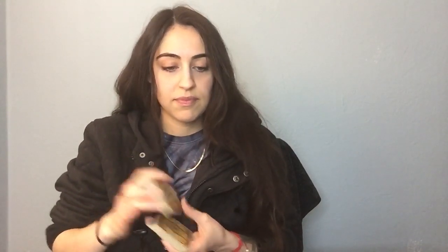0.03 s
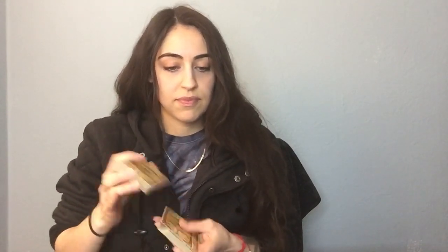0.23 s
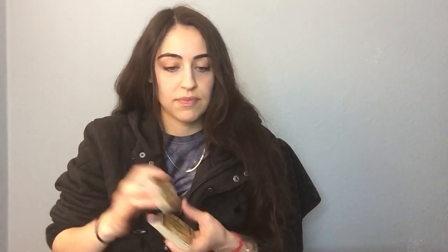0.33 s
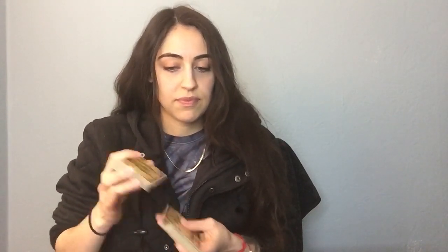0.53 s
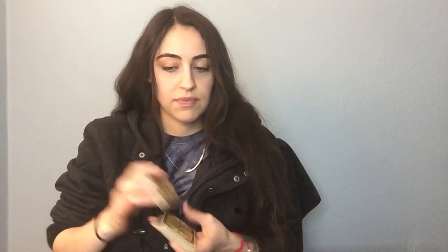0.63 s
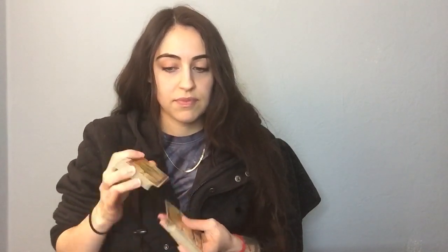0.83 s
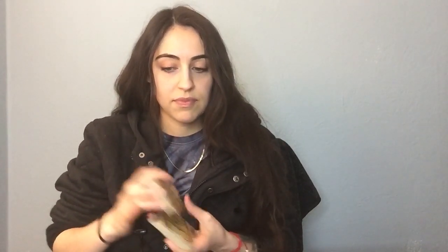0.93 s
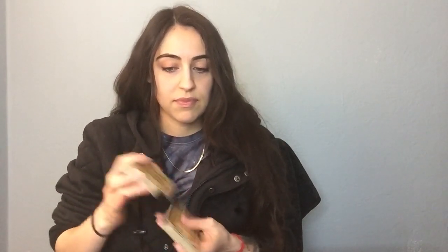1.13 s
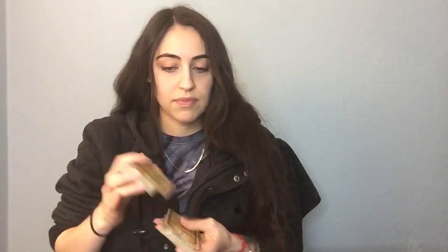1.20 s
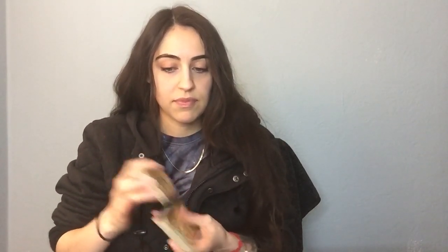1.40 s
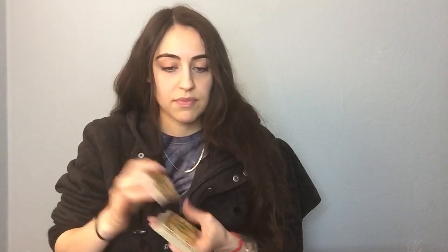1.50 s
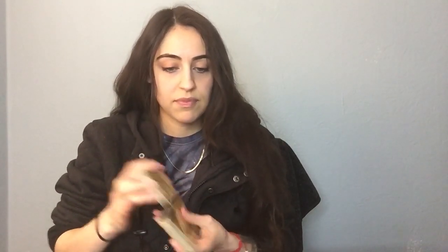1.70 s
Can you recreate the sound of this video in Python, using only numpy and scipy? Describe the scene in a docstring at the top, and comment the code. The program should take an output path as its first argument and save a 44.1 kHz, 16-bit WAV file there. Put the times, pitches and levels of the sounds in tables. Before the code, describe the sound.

Playing cards shuffled overhand, five crisp papery clacks in a steady rhythm, small quiet room

```python
"""Overhand card shuffle

A deck of playing cards is shuffled overhand in a small room: five strokes, about three a second.
In each stroke the lifted packet brushes the deck (grainy noise), its edges clack down (a burst of tiny impacts)
and make the held cards ring briefly (damped modes), then cards slide off with a papery rasp and flicking edges.
Faint taps of handling fall around the strokes, one dull thump joins the second, and quiet room tone lies below.
"""
import sys
import numpy as np
from scipy import signal
from scipy.fft import rfft, irfft
from scipy.io import wavfile
from scipy.ndimage import uniform_filter1d

SR = 44100
rng = np.random.default_rng(int(sys.argv[2]) if len(sys.argv) > 2 else 0)


def dump_mix(stems):
    """Bounce the given channels to the path in sys.argv[1] as a 16-bit WAV at rate SR."""
    frames = np.atleast_2d(stems).T  # one column per channel
    limited = np.clip(frames, -1, 1)  # hard clip at full scale
    pcm = np.round(limited * 32767).astype(np.int16)
    wavfile.write(sys.argv[1], SR, pcm)


N = 77175  # length [samples]


def amp(db):
    """Decibels to gain."""
    return 10 ** (np.asarray(db) / 20)


def unit(x):
    """Scales to rms 1."""
    return x / np.sqrt(np.mean(x ** 2) + 1e-20)


def read(points, hz):
    """Reads a table on a log-frequency axis."""
    f, value = np.transpose(points)
    return np.interp(np.log(hz + 1), np.log(f + 1), value)


def add(mix, s, sound):
    """Mixes a sound in at time s, trimming whatever falls outside the mix."""
    start = round(s * SR)
    sound = sound[max(-start, 0):]
    part = mix[max(start, 0):][:len(sound)]
    part += sound[:len(part)]


BASS_HZ, TREBLE_HZ = 610, 3050  # shelf corners
PRESENCE_HZ, PRESENCE_OCTAVES = 2870, 0.54  # centre and half-width of the presence bell


def colour(x, points, bass_db=0, presence_db=0, treble_db=0, size=4096):
    """Causal filter: a spectrum of unit power, then bass, presence and treble controls."""
    hz = abs(np.fft.fftfreq(size, 1 / SR))
    bass = 1 / (1 + (hz / BASS_HZ) ** 4)
    treble = 1 - 1 / (1 + (hz / TREBLE_HZ) ** 4)
    presence = np.exp(-(np.log2((hz + 1) / PRESENCE_HZ) / PRESENCE_OCTAVES) ** 2)
    tone_db = bass_db * bass + presence_db * presence + treble_db * treble
    gain = unit(amp(read(points, hz))) * amp(tone_db)
    # minimum phase: the response starts at once, with no pre-echo
    spectrum = np.exp(np.conj(signal.hilbert(np.log(gain))))
    taps = np.fft.ifft(spectrum).real
    return signal.fftconvolve(x, taps[:size // 2])[:len(x)]


EDGES_PER_S, EDGE_SPREAD_DB = 7000, 1  # card-edge impacts: mean rate, unevenness
FIBRES_PER_S, FIBRE_SPREAD_DB = 6000, 2  # paper-fibre catches: mean rate, unevenness


def grains(envelope, per_s, spread_db):
    """Random tiny impacts of uneven size that carry the energy of the envelope."""
    n = len(envelope)
    size = amp(spread_db * np.minimum(rng.exponential(1, n), 4))
    sign = rng.choice([-1, 1], n)
    struck = rng.random(n) < per_s / SR
    impacts = envelope * size * sign * struck
    return unit(impacts) * np.sqrt(np.mean(envelope ** 2))


def mode(hz, db, t60, rise_s, waver=0):
    """One damped vibration with a soft build-up; waver is the rms pitch drift as a fraction."""
    t = np.arange(SR // 5) / SR
    drift = unit(uniform_filter1d(rng.standard_normal(len(t)), size=130))
    pitch = hz * (1 + waver * drift)
    turns = np.cumsum(pitch) / SR + rng.random()
    rise = 1 - np.exp(-t / rise_s)
    decay = np.exp(-np.log(1000) * t / t60)
    return amp(db) * rise * decay * np.sin(2 * np.pi * turns)


# spectrum of the quiet room: (frequency [Hz], relative level [dB])
ROOM_TONE_COLOUR = [(25, -20.5), (38, -14), (52, -1), (100, -4.5), (160, -8), (250, -9.5), (320, -5),
                    (450, -12), (600, -13), (1040, -14), (1650, -17), (2200, -19), (4800, -22), (6500, -21),
                    (10500, -29), (16000, -30)]
ROOM_TONE_DB = -68.5  # rms level


def room_tone():
    """Quiet steady rumble and hiss: white noise shaped by the room's spectrum."""
    white = rng.standard_normal(N)
    shape = amp(read(ROOM_TONE_COLOUR, np.fft.rfftfreq(N, 1 / SR)))
    return amp(ROOM_TONE_DB) * unit(irfft(rfft(white) * shape, N))


# soft taps of fingers and cards:
# (time [s], level [dB], decay [s], pitch [Hz], ring relative to level [dB])
TAPS = [(.001, -57.5, 0.026, 855, -12), (0.345, -56.5, 0.0041, 1280, 11), (0.65, -59.5, 0.0046, 1400, 11),
        (.934, -64, .003, 1520, 14), (0.964, -66, 0.0093, 1760, 14), (.973, -62, 0.014, 1240, 5),
        (.997, -69, 0.0018, 1200, 24)]
# spectrum of the touch: (frequency [Hz], relative level [dB])
TAP_COLOUR = [(60, -20.5), (300, -7.5), (800, -4.5), (1300, -1.5), (2200, -8), (5000, -16), (15000, -30.5)]
TAP_RISE_S, TAP_T60_S = 0.0018, 0.013  # the ring


def tap(db, decay_s, hz, ring_db):
    """A dull little touch on the deck with a short ring."""
    t = np.arange(SR // 5) / SR
    impacts = grains(np.exp(-t / decay_s), EDGES_PER_S, EDGE_SPREAD_DB)
    touch = colour(impacts, TAP_COLOUR)
    ring = mode(hz, ring_db, TAP_T60_S, TAP_RISE_S)
    return amp(db) * (touch + ring)


# room decay: (frequency [Hz], t60 [s])
ROOM = [(200, 0.24), (700, 0.16), (1500, 0.16), (4500, 0.16), (8000, 0.14), (15000, 0.043)]
ROOM_DB, ROOM_DELAY_S = -15.5, .005
ECHOES_PER_S = 4000


def room(x, size=256):
    """Dense reflections from near walls, the top of the treble dying first."""
    n = SR // 2
    echoes = rng.choice([-1., 1.], n) * (rng.random(n) < ECHOES_PER_S / SR)
    hz, t, bands = signal.stft(echoes, SR, nperseg=size)
    decay = np.exp(-np.log(1000) * t / read(ROOM, hz)[:, None])
    tail = signal.istft(bands * decay, SR, nperseg=size)[1]
    wet = np.zeros(N)
    add(wet, ROOM_DELAY_S, signal.fftconvolve(x, tail / np.linalg.norm(tail)))
    return amp(ROOM_DB) * wet


# spectrum of card faces and edges rubbing: (frequency [Hz], relative level [dB])
PAPER_COLOUR = [(25, -41), (70, -18.5), (140, -15.5), (220, -2), (400, -0.5), (750, 0), (1500, 1),
                (2500, -1), (4200, -3), (7000, -5.5), (10400, -12), (12500, -10), (15500, -18)]


def rasp(peak_s, db, rise_s, fall_s, bass_db, treble_db, swell_power):
    """Paper faces catch and slip in a rasp that swells and fades; returns start time and sound."""
    t = np.arange(-SR // 8, SR // 6) / SR  # zero at the peak
    swell = abs(t / rise_s) ** swell_power
    envelope = np.exp(-np.where(t < 0, swell, t / fall_s))
    catches = grains(envelope, FIBRES_PER_S, FIBRE_SPREAD_DB)
    sound = colour(catches, PAPER_COLOUR, bass_db=bass_db, treble_db=treble_db)
    return peak_s + t[0], amp(db) * sound


# the packet brushing the deck on its way down:
# (peak time [s], level [dB], rise [s], fall [s], bass [dB], treble [dB])
BRUSHES = [(0.231, -46.5, 0.0094, 0.0028, -7, -0.5), (.541, -51, 0.012, 0.0036, -2, 3),
           (.852, -58.5, 0.015, 0.024, -8, 2.5), (.869, -48, 0.0055, 0.0033, -1, 3),
           (1.155, -64.5, 0.013, 0.025, 6, 7.5), (1.455, -57.5, 0.0081, 0.0037, -3, 4)]


def brush(*row):
    """The packet rubs the deck on its way down, with a plain exponential swell."""
    return rasp(*row, swell_power=1)


# packet landings: (time [s], level [dB], time over which the edges land [s], settling time [s],
# bass [dB], presence [dB], treble [dB])
CLACKS = [(0.234, -24.5, 0.0055, 0.024, -5.5, 0, -5.5), (0.5421, -24, 0.0032, 0.016, -2.5, -3.5, -2.5),
          (.8700, -26.5, 0.0042, .018, -8, -3.5, 2), (1.1726, -33.5, 0.0016, 0.005, -12.5, 5, 4.5),
          (1.2154, -42.5, .002, 0.0093, 8, 7, -2), (1.4559, -44.5, 0.0029, .007, -1, -8, 1),
          (1.4625, -37.5, 0.0075, 0.012, 7.5, -5, -2), (1.4774, -37.5, 0.0038, 0.0059, 1, 4, -2)]
# spectrum of the edges: (frequency [Hz], relative level [dB])
CLACK_COLOUR = [(25, -40), (60, -30), (140, -20.5), (220, -12), (450, -4.5), (1000, -2), (1600, 0.5),
                (2800, -1), (4000, 3), (4800, -3.5), (6000, -3), (8500, -8), (10400, -14), (12500, -11.5),
                (15500, -13)]
# ring of the held deck, for every landing: (frequency [Hz], relative level [dB], t60 [s])
DECK = [(221, -24, 0.19), (369.7, -20, .12), (457.6, -12.5, .08), (602.3, -17, 0.11), (836.6, -11.5, .08),
        (999, -8, .08), (1320, -7.5, .07), (1649, -7, 0.063), (1970, -10.5, .08), (2340, -10, .07),
        (2660, -11, 0.063), (3825, -7.5, .06), (4010, -15.5, .06), (5327, -5.5, .05)]
CLACK_ATTACK_S, CLACK_DECAY_S, SETTLE_DB = .0004, 0.0049, -8.5
SNAP_DB, SNAP_DECAY_S, SNAP_TREBLE_DB = -5.5, 0.0012, 4  # treble is on top of the landing's own
DECK_RISE_S, DECK_WAVER = 0.0021, .007  # loose cards make the pitch waver


def clack(db, spread_s, settle_s, bass_db, presence_db, treble_db):
    """The first edge snaps; the rest land in a quick cluster, settle, and ring the deck."""
    t = np.arange(SR // 5) / SR
    after = np.maximum(t - spread_s, 0)
    attack = np.minimum(t / CLACK_ATTACK_S, 1)
    fall = np.exp(-after / CLACK_DECAY_S) + amp(SETTLE_DB) * np.exp(-after / settle_s)
    cluster = grains(attack * fall, EDGES_PER_S, EDGE_SPREAD_DB)
    edges = colour(cluster, CLACK_COLOUR, bass_db, presence_db, treble_db)
    first = grains(np.exp(-t / SNAP_DECAY_S), EDGES_PER_S, EDGE_SPREAD_DB)
    snap = colour(first, CLACK_COLOUR, bass_db, presence_db, treble_db + SNAP_TREBLE_DB)
    ring = sum(mode(hz, level, t60, DECK_RISE_S, DECK_WAVER) for hz, level, t60 in DECK)
    return amp(db) * (edges + amp(SNAP_DB) * snap + ring)


# the two main bending modes of the packet, set by its size and the grip:
# (time [s], low mode [Hz], its level [dB], high mode [Hz], its level [dB])
FLEXES = [(.2355, 894.4, -16.5, 1476, -12.5), (.543, 1010, -31.5, 1560, -15), (0.873, 997, -24, 1481, -18),
          (1.456, 807, -34.5, 1552, -28), (1.462, 900, -25.5, 1524, -27)]
FLEX_RISE_S, FLEX_T60_S, FLEX_WAVER = 0.0022, 0.039, 0.041
FLEX_ROOM_DB = -1  # the knock feeds the room slightly less than the other sounds do


def flex(low_hz, low_db, high_hz, high_db):
    """The hollow knock of the packet bending as it lands."""
    low = mode(low_hz, low_db, FLEX_T60_S, FLEX_RISE_S, FLEX_WAVER)
    high = mode(high_hz, high_db, FLEX_T60_S, FLEX_RISE_S, FLEX_WAVER)
    return low + high


# single card edges flicking past: (time [s], level [dB], treble [dB])
FLICKS = [(0.258, -36, -4.5), (.274, -43, 9), (0.5656, -37, -3), (0.586, -33.5, 0), (.5935, -56, 6),
          (0.898, -45, -1), (1.202, -47.5, 16), (1.394, -67, 10.5), (1.489, -32, -2)]
FLICK_DECAY_S = 0.0014


def flick(db, treble_db):
    """One card edge snaps past its neighbour."""
    t = np.arange(SR // 20) / SR
    impacts = grains(np.exp(-t / FLICK_DECAY_S), FIBRES_PER_S, EDGE_SPREAD_DB)
    return amp(db) * colour(impacts, PAPER_COLOUR, treble_db=treble_db)


# cards sliding off after the landing:
# (peak time [s], level [dB], rise [s], fall [s], bass [dB], treble [dB])
SLIDES = [(.259, -35.5, 0.014, 0.017, 2, -4), (.570, -38, 0.019, 0.02, 1.5, -2),
          (.897, -44, .011, 0.019, 3.5, 0.5), (1.203, -40, 0.018, .014, 4, 4),
          (1.486, -42, .01, 0.015, 6.5, -4)]


def slide(*row):
    """Cards slip off the packet; the steeper power gives a rounder swell into the peak."""
    return rasp(*row, swell_power=1.4)


# dull low thump, a push of air as the packet lands:
# (time [s], frequency [Hz], level [dB], t60 [s])
THUMPS = [(0.547, 84, -46.5, 0.092)]


def thump(hz, db, t60):
    """A push of air: one low damped vibration."""
    return mode(hz, db, t60, rise_s=0.0051)


def scene():
    """The cards, their reflections and the quiet room."""
    cards, knocks = np.zeros(N), np.zeros(N)
    for s, *row in CLACKS:
        add(cards, s, clack(*row))
    for s, *row in FLEXES:
        add(knocks, s, flex(*row))
    for row in BRUSHES:
        add(cards, *brush(*row))
    for row in SLIDES:
        add(cards, *slide(*row))
    for s, *row in FLICKS:
        add(cards, s, flick(*row))
    for s, *row in THUMPS:
        add(cards, s, thump(*row))
    for s, *row in TAPS:
        add(cards, s, tap(*row))
    reflections = room(cards + amp(FLEX_ROOM_DB) * knocks)
    return (cards + knocks + reflections + room_tone())[None]


CUTOFF_HZ = 15950


def record(dry):
    """The recorder's band limit: a steep linear-phase low-pass."""
    low_pass = signal.firwin(301, CUTOFF_HZ, window=("kaiser", 8), fs=SR)
    return signal.oaconvolve(dry, low_pass[None], "same")


dry = scene()
out = record(dry)
dump_mix(out)
```